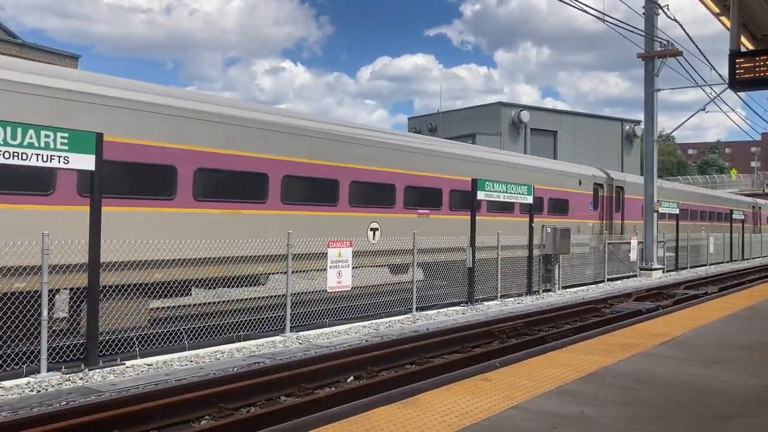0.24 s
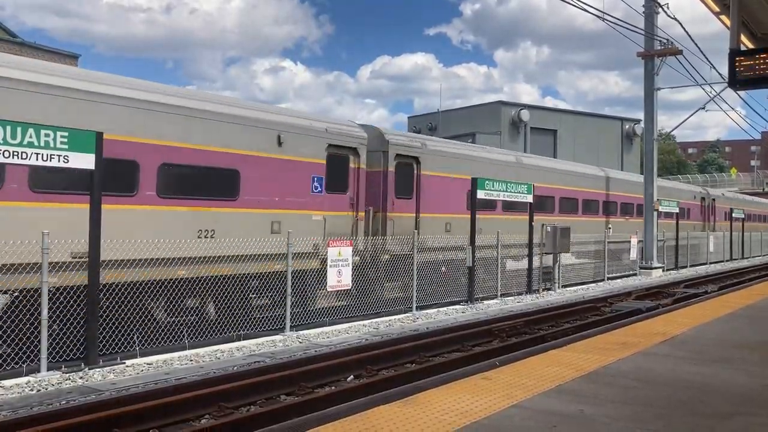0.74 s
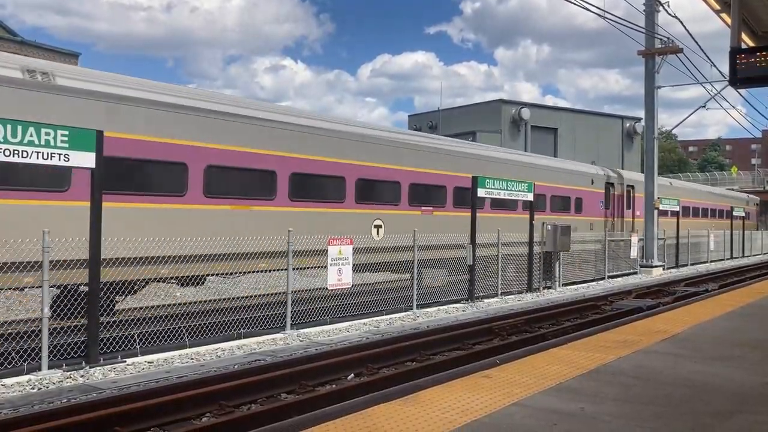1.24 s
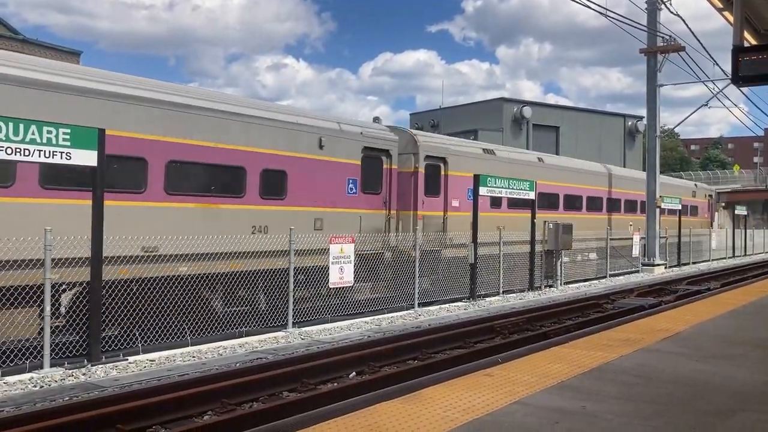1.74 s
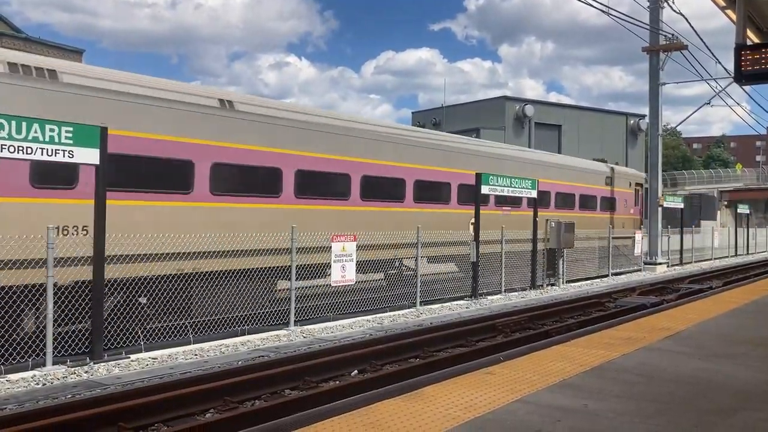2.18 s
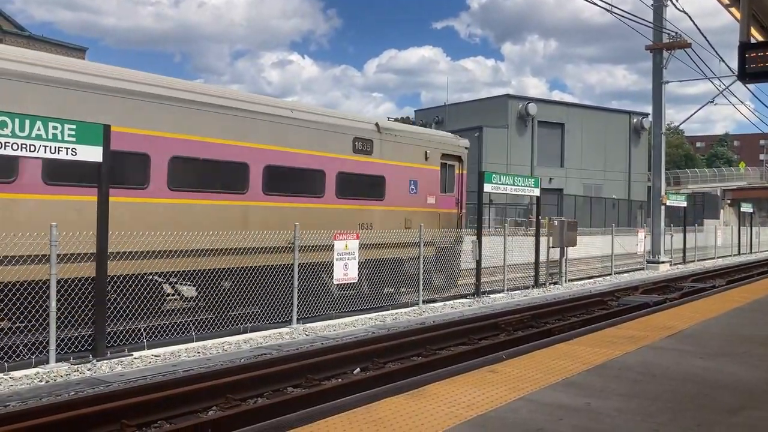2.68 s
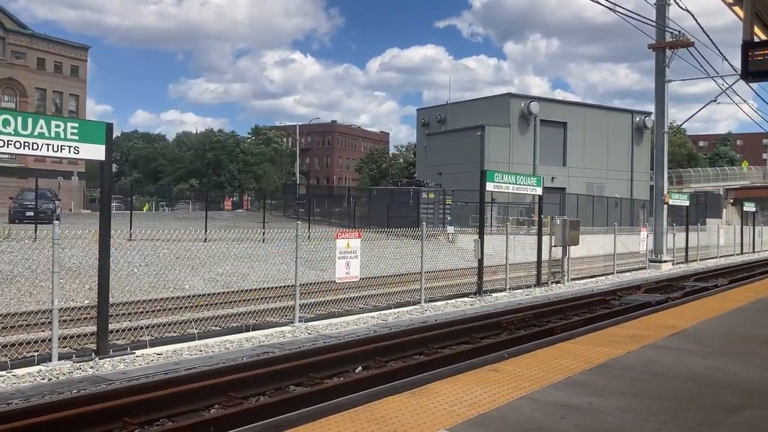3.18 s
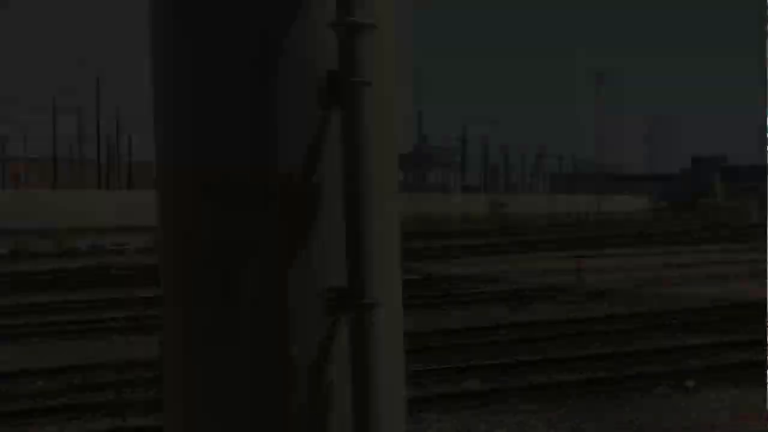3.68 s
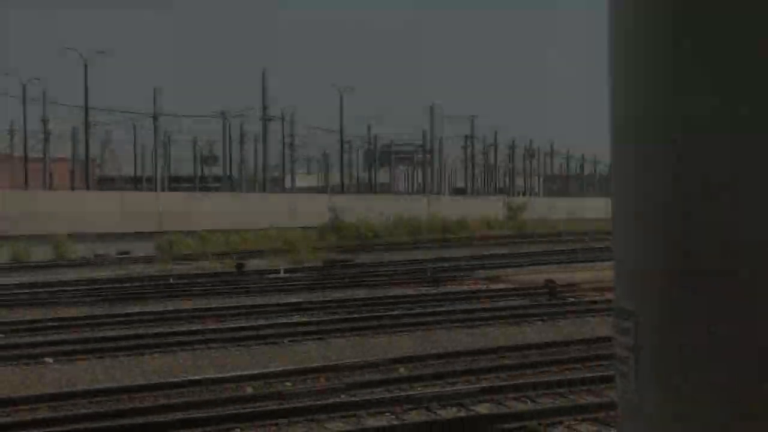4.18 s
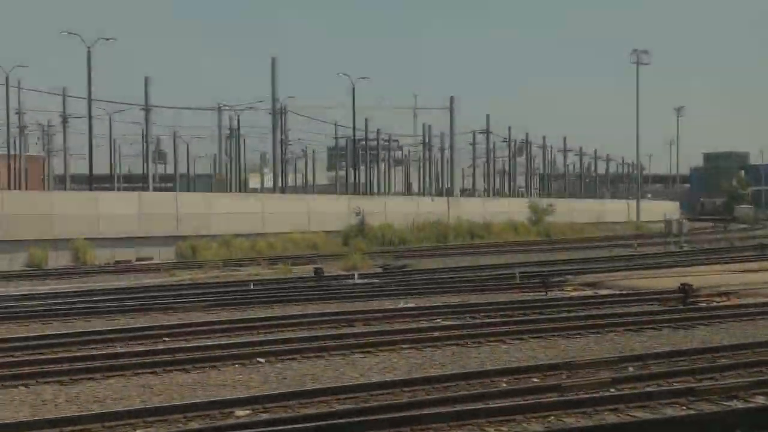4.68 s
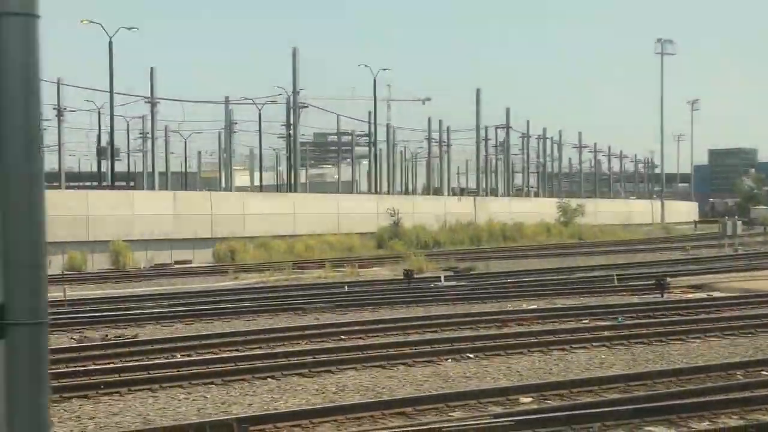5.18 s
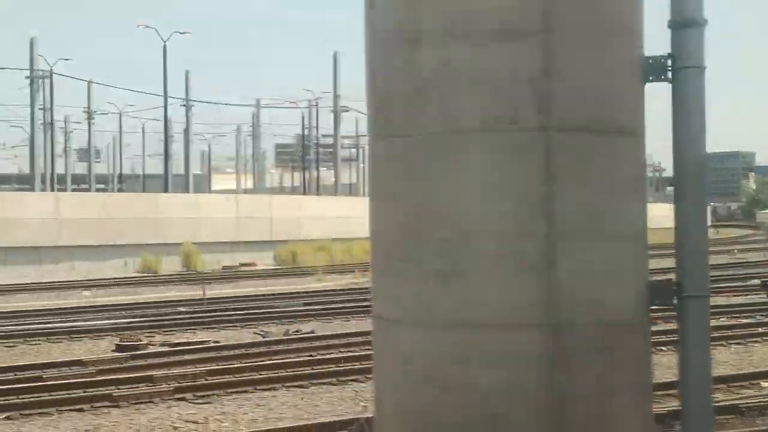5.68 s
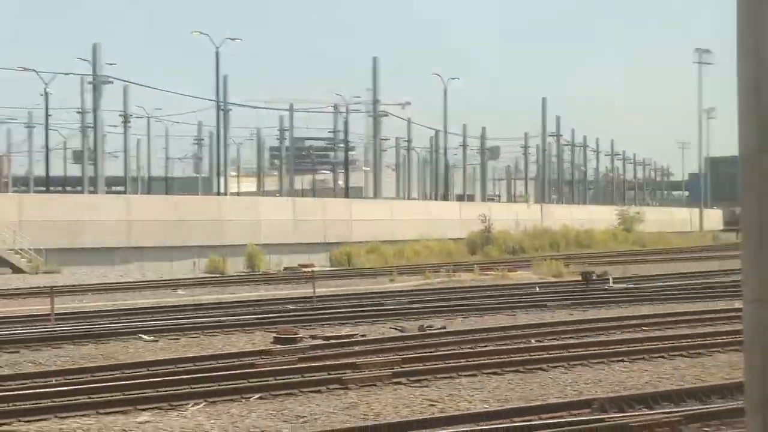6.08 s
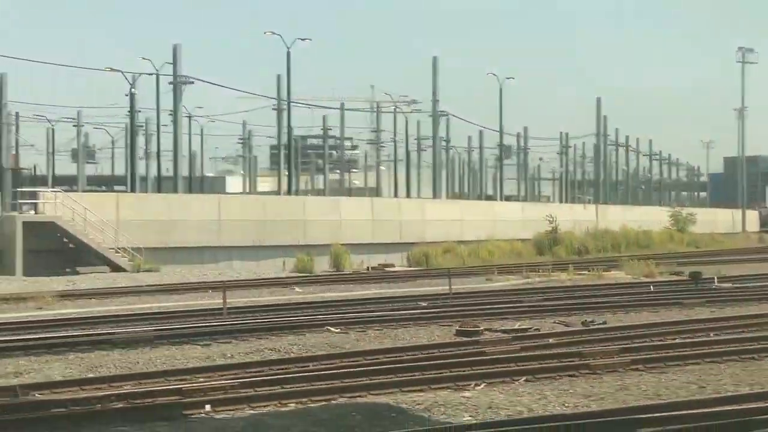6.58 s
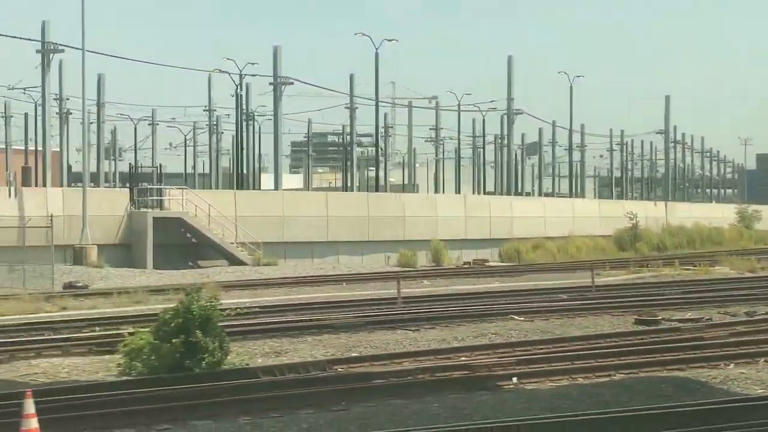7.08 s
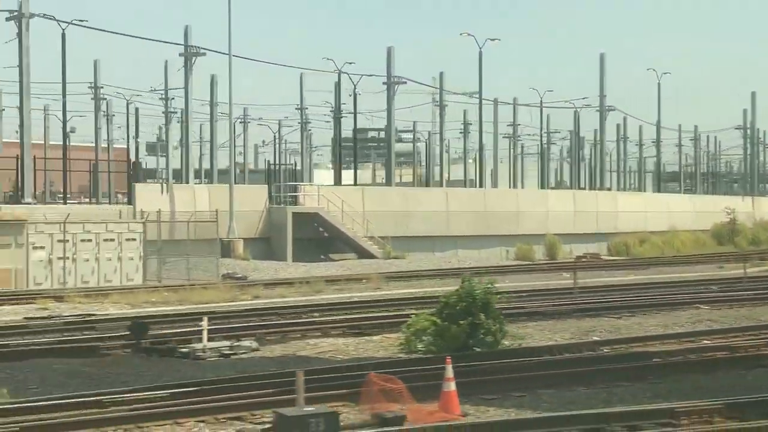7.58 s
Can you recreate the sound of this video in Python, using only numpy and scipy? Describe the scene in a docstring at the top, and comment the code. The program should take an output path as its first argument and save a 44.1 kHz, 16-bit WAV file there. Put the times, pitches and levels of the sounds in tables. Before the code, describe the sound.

At 0 s, on an open platform, coaches are already rolling past close by: grainy low roar, airy steel hiss, track rumble and a wavering low locomotive drone receding. From about 0.6 s scattered blows begin, and from 1 to 1.9 s a flat wheel pounds roughly ten times a second, each hard knock ringing rail and wheels and swelling the rush. Thin metallic rings glide downward in pitch. Weaker knocks continue to 2.7 s; the last wheels ring near 3.1 s and the roar falls away by 3.5 s. From 3.25 s an electric train interior fades in, full by 5.3 s: deep motor hum around 90 Hz, steady fan tones, boomy body and dulled rolling. Groans swell near 4.4 and 5.2 s. Around 6 s the hum beats over twice a second, with faint motor whines. Small trim ticks fall near 3.7, 4, 5.7 and 6.8-7 s; the ride continues steadily to the end.

```python
"""Commuter coaches roll past a station platform: roar, hiss and ringing wheels over a receding locomotive drone.
Soon a flat-spotted wheel pounds about ten times a second; each blow rings the track and swells the rolling.
Noise bands make the rolling, and narrow resonances that fall in Doppler pitch make the wheels ring.
The platform fades out and the inside of a moving electric train fades in: two beating motor tones, steady fan
tones, a booming car body, dulled rolling noise, groans of the car body and motor whines, and ticks of loose trim."""
import sys
import numpy as np
from scipy import signal
from scipy.fft import rfft, irfft
from scipy.io import wavfile
from scipy.ndimage import uniform_filter1d

SR = 44100
rng = np.random.default_rng(int(sys.argv[2]) if len(sys.argv) > 2 else 0)


def waveform_to_disk(signal):
    """Save audio, clipped to [-1, 1], as 16-bit WAV at the path in sys.argv[1]."""
    frames = np.transpose(np.atleast_2d(signal))
    scaled = np.clip(frames, -1, 1) * 32767
    samples = np.round(scaled).astype(np.int16)
    wavfile.write(sys.argv[1], SR, samples)


N = 345744
TIME, FREQ = np.arange(N) / SR, np.fft.rfftfreq(N, 1 / SR)  # s, Hz

# Rolling noise at the platform, before its swells: time_s, roar_db, hiss_db
PLATFORM_ROLL = [(0, -29, -38), (0.55, -25, -37.5), (1, -21, -32), (1.4, -21, -30), (1.8, -20, -34),
                 (2.2, -22.5, -36.5), (2.85, -29.5, -40.5), (3.25, -29.5, -41), (3.55, -40.5, -52.5)]
# Its spectrum before it is split into roar and hiss: frequency_hz, relative_db
PLATFORM_ROLL_COLOUR = [(120, -12), (200, -3.5), (400, -2), (600, -5), (800, -5), (1080, -10),
                        (1800, -15.5), (2500, -21.5), (3450, -29.5), (4400, -31.5), (6500, -30.5),
                        (9000, -40), (13000, -39.5), (15500, -78)]
# Bands in which the whole train of wheels and the rail radiate: pitch_hz, width_hz, lift_db
STEEL_BANDS = [(496, 60, 3), (720, 220, 0.5), (1250, 41, 2.5), (1660, 170, 2.5), (1980, 55, 4),
               (2216, 200, 4), (2950, 480, 4.5), (3880, 560, 6), (4420, 240, 4.5), (4840, 240, 3),
               (6030, 340, 0)]
# Single parts of the running gear ring out: nearest_s, half_length_s, pitch_hz, width_hz, level_db
GEAR_RINGS = [(.72, .07, 1565, 35, -34), (.78, 0.12, 2205, 70.6, -40), (.85, 0.18, 3150, 60, -52),
              (1.02, .08, 5000, 110, -48), (1.15, 0.14, 2140, 45, -42), (1.25, 0.14, 756, 60, -30.5),
              (1.37, 0.17, 1515, 45, -29.5), (1.38, .05, 5930, 100, -40), (1.45, 0.072, 4830, 80, -44),
              (1.5, 0.11, 3750, 90, -50), (1.62, 0.39, 215.9, 61, -26.5), (1.7, 0.081, 5130, 110, -50),
              (1.8, 0.13, 3940, 90, -46), (1.95, 0.12, 4900, 100, -46.5), (2.05, .16, 4150, 120, -43.5),
              (2.1, 0.16, 2800, 110, -44.5), (2.15, 0.059, 5640, 70.5, -47), (2.42, 0.073, 5020, 45, -53),
              (2.62, 0.13, 482, 70, -28.5), (2.9, 0.096, 1930, 25, -45), (2.94, 0.074, 4430, 70.8, -46),
              (3.06, 0.16, 1650, 45, -46), (3.1, 0.086, 4960, 130, -53), (3.12, .06, 5700, 70, -50),
              (3.15, 0.13, 3980, 90, -51), (3.24, 0.15, 2850, 130, -40)]
# What a coach wheel rings with: pitch_hz, width_hz, relative_db
WHEEL_MODES = [(1560, 64, 1.5), (2147, 50, -1.5), (2933, 120, -1), (3970, 57, -2.5), (4930, 70, -9.5),
               (5860, 100, -10.5)]
# Bogies (wheel frames) go by: nearest_s, level_db (both axles), tuning_ratio, treble_lift_db_per_octave
BOGIES = [(.15, -53, 1.01, 0), (.92, -47.5, 1.02, -9), (1.38, -36, .98, -4), (1.92, -44, .995, -6),
          (3.08, -48, 1.0, 5)]
# Track rumble: time_s, level_db
RUMBLE_LEVEL = [(0, -28), (1.1, -28.5), (2, -33), (3.3, -35)]
# Spectrum of the rumble: frequency_hz, relative_db
RUMBLE_COLOUR = [(15, -40), (30, -34), (42, -9), (56, -8), (85, -2), (120, -9), (170, -4.5), (400, -58)]
# What rail, sleepers and bogie ring with: pitch_hz, relative_db, time_to_fall_60_db_s
TRACK_MODES = [(202, 6, 0.15), (243, 3.5, 0.091), (302.8, 2.5, 0.14), (367.6, 8, 0.089), (468, 4, 0.1),
               (766, 10.5, 0.065), (926, 2, 0.076), (1310, 5.5, 0.062), (2070, -1, 0.018),
               (2720, -21, 0.014)]
# Blows on the rail, most from the flat spot that strikes once a turn: start_s, strength_db, strongest_pitch_hz
BLOWS = [(0.602, -21, 400), (0.775, -26, 253), (0.876, -16, 380), (0.963, -16.5, 404), (0.996, -17.5, 242),
         (1.057, -6.5, 368), (1.063, -15.5, 865), (1.16, -10, 223.1), (1.184, -21, 298), (1.256, -8, 748),
         (1.279, -21, 398), (1.353, -9, 484), (1.444, -18, 305), (1.468, -13, 297), (1.544, -13.5, 300),
         (1.575, -16.5, 203), (1.612, -25, 232), (1.664, -11.5, 424), (1.703, -18.5, 248),
         (1.74, -13.5, 334), (1.786, -11, 322), (1.838, -16.5, 372), (1.885, -13, 300), (1.931, -24, 237),
         (2.195, -17.5, 716), (2.292, -24, 760), (2.377, -22, 383), (2.483, -23, 264), (2.621, -22, 486),
         (2.69, -22, 498)]
# Spectrum of the rolling heard inside, before it is split: frequency_hz, relative_db
RIDE_COLOUR = [(120, -12), (290, -3.5), (400, -2), (640, 3.5), (840, -2), (1000, -5), (1380, -8),
               (1700, -14.5), (2300, -15), (3300, -20), (4300, -20), (5200, -25), (9000, -36),
               (15000, -49.5)]
# Spectrum of the car body's boom: frequency_hz, relative_db
BOOM_COLOUR = [(15, -30), (31, -31), (43, -12.5), (65, -13.5), (105, -8.5), (132, -11.5), (152, -19.5),
               (167, 1.5), (177, -8), (200, -6), (216, -13), (255, -22.5), (330, -24), (700, -81)]
# How hard the car body is shaken: time_s, level_db
SHAKE = [(3.2, -2.5), (4.2, -0.5), (4.9, -3.5), (5.12, -1), (5.6, -.5), (7.85, 0.5)]
# Body groans and motor whines swell and fade: centre_s, half_length_s, pitch_hz, width_hz, level_db
CAR_GROANS_AND_WHINES = [(4.39, 0.15, 174, 21, -24), (5.19, 0.1, 175.4, 22, -21.5),
                         (5.19, 0.05, 241.5, 19, -26.5), (5.33, 0.048, 294, 35, -36.5),
                         (6.66, 1.87, 381.5, 43, -36.5), (6.15, 1.22, 561.2, 12, -38.5),
                         (6.2, 2.4, 659, 22, -41.5), (6.2, 1.6, 754, 67, -46), (6.26, 2.2, 973, 123, -37.5)]
# Level of the second motor against the first: time_s, relative_db
SECOND_MOTOR = [(3.2, -20), (5.8, -24), (6.15, -6), (7.85, -14)]
# The hum dips briefly: centre_s, half_length_s, change_db
HUM_DIPS = [(3.733, 0.014, -15), (4.015, 0.016, -13), (4.307, 0.019, -9), (4.56, 0.043, -7)]
# Fans and pumps, some in close pairs that beat: pitch_hz, relative_db
FANS = [(45, -17.5), (117.7, -7.5), (119.04, -10.5), (147.2, -8), (161, -9.5), (167.3, -4.5), (171.6, -9),
        (178.4, -4.5), (188, -12.5), (201, -17), (235.6, -18), (237.7, -12.5), (297, -35), (382.2, -22)]
# Ticks of loose trim: start_s, relative_db, time_to_fall_60_db_s
TICKS = [(3.698, -44, 0.34), (3.9924, -40.5, 0.32), (5.7244, -42, 0.15), (6.761, -29.5, 0.33),
         (6.8867, -31.5, 0.42), (6.901, -40, 0.22), (6.966, -38, 0.2)]
# Spectrum of the ticks: frequency_hz, relative_db
TICK_COLOUR = [(1000, -21), (3000, 9), (6500, 7), (12000, -1), (16000, -14)]
# Left and right on the platform: frequency_hz, likeness_0_to_1, left_minus_right_db
OUTSIDE_STEREO = [(70, 0.82, 8), (171, 0.92, 3.5), (340, 0.68, 2), (704, 0.62, 1.2), (1500, 0.45, 3.5),
                  (3000, 0.05, 1.5), (5350, 0, 1.5), (8600, 1, -0.5), (12000, 0.98, 0)]
# Left and right inside the train: frequency_hz, likeness_0_to_1, left_minus_right_db
INSIDE_STEREO = [(71, 0.74, 7), (173, 0.93, 3), (338, 0.25, 0.5), (700, 0.23, -0.5), (1490, 0.066, 5),
                 (3000, 0.042, 6.5), (5300, 0.36, 2.5), (8900, 1, -1.3), (12000, 0.79, 0.0)]

SPEED_M_PER_S, SOUND_M_PER_S, WHEELBASE_M = 23.1, 343, 2.6
WHEEL_TURNS_HZ = 10.1
# The rolling noise and the wheels swell with each blow
SURGE_PEAK_S, SURGE_POWER = 0.012, 0.53
# Bogies: length of ringing, time scale of the pitch glide, full range of axle tuning (share of the pitch)
BOGIE_HALF_S, GLIDE_S, AXLE_DETUNE = 0.264, 0.34, 0.024
# Many fainter wheels: level against the hiss, full range of tuning (share of the pitch), one ring's length and width
CROWD_DB, CROWD_DETUNE, CROWD_HALF_S, CROWD_WIDTH_HZ = -8, 0.115, 0.046, 43
WHEELS_FADE_S, WHEELS_GONE_S = 3.05, 3.55
# Small knocks of rough treads and loose gear; the spread sets how uneven their sizes are
KNOCKS_PER_S, KNOCK_DB, KNOCK_SPREAD_DB = 70, -7, 1  # KNOCK_DB is against the roar
# The locomotive's exhaust drone throbs irregularly and recedes
DRONE_DB, DRONE_FALL_DB_PER_S, THROB_DB = -26.5, 8.5, -4.5
# The ride fades in, then holds; the powers bend the fade
FADE_START_S, FADE_FULL_S = 3.246, 5.3
ROAR_FADE_POWER, BOOM_FADE_POWER, HUM_FADE_POWER = 0.8, 0.75, 0.98
RIDE_ROAR_DB, RIDE_HISS_DB = -30.5, -38.5
BOOM_DB, BOOM_SWELL_DB = -25, 1
# Two motors at nearly one speed beat; one of the beat's dips falls at BEAT_DIP_S
HUM_HZ, HUM_DB, HUM_WAVER_DB = 90.0, -18, 0.95
BEAT_HZ, BEAT_DIP_S = 2.42, 6.18
FANS_DB = -23.5
SNAP_S, RATTLE_SHARE = 0.0015, 0.22
LEFT_LAG_S, TREBLE_EDGE_HZ = 0.000268, 15750


def gain_of(db):
    """Turns decibels into a gain."""
    return 10 ** (np.asarray(db) / 20)


def evened(x):
    """Scales a sound to an average (rms) strength of 1."""
    return x / np.sqrt(np.mean(x ** 2) + 1e-20)


def read(points, hz, axis=1):
    """Reads one column of a table between its points, on a log frequency scale."""
    table = np.array(points, float)
    return np.interp(np.log(hz + 1), np.log(table[:, 0] + 1), table[:, axis])


def level(rows, axis=1):
    """Turns one dB column over time into a gain that fades 80 dB a second beyond its ends."""
    table = np.array(rows, float)
    beyond_s = np.maximum(table[0, 0] - TIME, 0) + np.maximum(TIME - table[-1, 0], 0)
    return gain_of(np.interp(TIME, table[:, 0], table[:, axis]) - 80 * beyond_s)


def wander(hz, size=4096):
    """Drifts slowly at random with rms 1, with up to about hz changes a second."""
    step_s = TIME[-1] / (size - 1)
    smoothing = np.exp(-(np.fft.rfftfreq(size, step_s) / hz) ** 2)
    slow = irfft(rfft(rng.standard_normal(size)) * smoothing, size)
    return np.interp(TIME, np.arange(size) * step_s, evened(slow))


def coloured(x, colour):
    """Filters a sound by the levels of a spectrum table."""
    return irfft(rfft(x) * gain_of(read(colour, FREQ)), N)


def noise(colour, patchy_db):
    """Makes two unrelated noises of one colour that share short-lived patches over time and frequency."""
    _, _, spectra = signal.stft(rng.standard_normal((2, N)), SR, nperseg=512)
    patches = rng.standard_normal(spectra.shape[1:])
    patches = uniform_filter1d(patches, size=9, axis=0)  # smooth over frequency
    patches = evened(uniform_filter1d(patches, size=10, axis=1))  # and over time
    patchy = signal.istft(spectra * gain_of(patchy_db * patches), SR)[1][:, :N]
    return coloured(patchy, colour)


def band(x, low_hz, high_hz):
    """Scales a whole sound so that the given band has rms 1."""
    inside = (FREQ > low_hz) & (FREQ < high_hz)
    return x / np.std(irfft(rfft(x) * inside, N))


def stereo(x, field):
    """Turns two unrelated signals into a partly alike left and right, with a level lean and a late left."""
    a, b = rfft(x)
    same = np.clip(read(field, FREQ), 0, 1)
    lean = gain_of(read(field, FREQ, axis=2) / 2)
    left = a * lean * np.exp(-2j * np.pi * FREQ * LEFT_LAG_S)
    right = (same * a + np.sqrt(1 - same ** 2) * b) / lean
    return irfft(np.array([left, right]), N)


def rolling(colour, patchy_db, split_hz):
    """Rough steel on steel: a low roar and a high hiss; wheels are too small to radiate deep bass."""
    x = noise(colour, patchy_db)
    low = 1 / (1 + (FREQ / split_hz) ** 4)
    no_bass = FREQ ** 4 / (FREQ ** 4 + 110 ** 4)
    roar = irfft(rfft(band(x, 250, 1200)) * low * no_bass, N)
    hiss = irfft(rfft(band(x, 2000, 8000)) * (1 - low), N)
    return roar, hiss


def sing(rows, doppler, passing_s, flutter_db, breakup_db):
    """Narrow noisy tones swell, flutter and fade; with Doppler they are sharp on approach, flat when leaving."""
    step = 32  # the slow swings are worked out at every 32nd sample
    out, contact = np.zeros((2, N)), wander(15)[::step]
    rub = rng.standard_normal((2, len(contact))) + 1j * rng.standard_normal((2, len(contact)))
    for s, length, hz, width, db in rows:
        near = slice(*np.searchsorted(TIME, [s - 2.5 * length, s + 2.5 * length]))
        t = TIME[near][::step] - s
        # each ring takes its own random stretch of the rubbing
        stretch = (np.arange(len(t)) + int(rng.random() * len(contact))) % len(contact)
        swing = signal.lfilter(*signal.butter(2, width / 2, fs=SR / step), rub[:, stretch])
        # roughness comes round once in every turn of the wheel
        flutter = flutter_db * np.sin(2 * np.pi * (WHEEL_TURNS_HZ * t + rng.random()))
        # the contact grips and lets go at random
        swing *= gain_of(flutter + breakup_db * contact[stretch])
        swing *= gain_of(db) / np.std(swing.real) * np.exp(-(t / length) ** 2 / 2)
        turns = hz * np.cumsum(1 - doppler * np.tanh(t / passing_s)) * step / SR
        tone = np.exp(2j * np.pi * np.interp(TIME[near], s + t, turns))
        out[:, near] += [(np.interp(TIME[near], s + t, side) * tone).real for side in swing]
    return out


def bogie_modes():
    """Both axles of each passing bogie ring in all wheel modes, with the bogie's own tuning and brightness."""
    middle_hz = WHEEL_MODES[2][0]
    lead_s = 0.5 * WHEELBASE_M / SPEED_M_PER_S
    rows = []
    for s, db, tuning, lift_db in BOGIES:
        for axle_s in (-lead_s, lead_s):
            for hz, width, mode_db in WHEEL_MODES:
                pitch = hz * (tuning + AXLE_DETUNE * (rng.random() - 0.5))
                axle_db = db - 10 * np.log10(2)  # the two axles share the power
                loud = axle_db + mode_db + lift_db * np.log2(hz / middle_hz)
                rows.append((s + axle_s, BOGIE_HALF_S, pitch, width, loud))
    return rows


def other_wheels(count=280):
    """Many fainter wheels, each a little differently tuned, ring briefly one after another."""
    when, detune, size = rng.random((count, 3)).T
    s = 3.3 * (np.arange(count) + when) / count  # spread over 3.3 s
    hz, _, mode_db = np.array(WHEEL_MODES)[np.arange(count) % len(WHEEL_MODES)].T
    roll = np.array(PLATFORM_ROLL)
    db = np.interp(s, roll[:, 0], roll[:, 2]) + CROWD_DB + mode_db - 5 * size
    pitches = hz * (1 + CROWD_DETUNE * (detune - 0.5))
    return [(at, CROWD_HALF_S, pitch, CROWD_WIDTH_HZ, loud) for at, pitch, loud in zip(s, pitches, db)]


def coaches():
    """Rolling noise and ringing wheels swell with each blow of the flat-spotted wheel."""
    roar, hiss = rolling(PLATFORM_ROLL_COLOUR, patchy_db=1.4, split_hz=1500)
    surge = np.zeros(N)
    age = np.arange(SR // 4) / SR / SURGE_PEAK_S
    for s, db, _ in BLOWS:
        swell = surge[round((s - 0.0038) * SR):][:len(age)]  # starts just ahead of the blow
        swell += gain_of(SURGE_POWER * db) * age * np.exp(1 - age)
    surge -= uniform_filter1d(surge, size=8800)  # keep only the change around a 0.2 s average
    roll = roar * level(PLATFORM_ROLL) * gain_of(-0.5 + 3.9 * surge)
    roll += hiss * level(PLATFORM_ROLL, axis=2) * gain_of(-1.5 + 6.1 * surge)
    lift_db = sum(db * np.exp(-(2 * (FREQ - hz) / width) ** 2 / 2) for hz, width, db in STEEL_BANDS)
    roll = irfft(rfft(roll) * gain_of(lift_db), N)
    wheels = sing(GEAR_RINGS + bogie_modes() + other_wheels(), doppler=SPEED_M_PER_S / SOUND_M_PER_S,
                  passing_s=GLIDE_S, flutter_db=2.0, breakup_db=2.5)
    fade_out = np.interp(TIME, [WHEELS_FADE_S, WHEELS_GONE_S], [1, 0])
    return roll + wheels * gain_of(11.4 * surge) * fade_out


def locomotive():
    """A drone of two wavering exhaust tones far down the line, over the noisy rumble of the track."""
    drone = np.zeros(N)
    for hz, db in [(84.5, 0.0), (96, -3.0)]:
        pitch_hz = hz + 1.05 * wander(7.0)
        drone += gain_of(db) * np.sin(2 * np.pi * np.cumsum(pitch_hz) / SR)
    rumble = evened(coloured(rng.standard_normal((2, N)), RUMBLE_COLOUR)) * level(RUMBLE_LEVEL)
    receding = gain_of(DRONE_DB - DRONE_FALL_DB_PER_S * TIME + THROB_DB * wander(3.3))
    return drone * receding * np.array([[1], [0]]) + rumble  # the drone is in the first signal only


def knocks():
    """Small irregular knocks ring single modes of the track, thickening the roar."""
    t, out = np.arange(SR // 8) / SR, np.zeros((2, N))
    chance, size, which = rng.random((3, N))
    sizes = gain_of(-KNOCK_SPREAD_DB * np.log(np.maximum(size, 0.1)))
    hits = (chance < KNOCKS_PER_S / SR) * sizes
    mode = (which * len(TRACK_MODES)).astype(int)
    rise = 1 - np.exp(-t / 0.002)
    for at in np.flatnonzero(hits):
        hz, db, t60 = TRACK_MODES[mode[at]]
        turns = hz * (1 + 0.053 * rng.standard_normal()) * t + rng.random((2, 1))
        knock = hits[at] * gain_of(db - 60 * t / t60) * rise * np.sin(2 * np.pi * turns)
        out[:, at:at + len(t)] += knock[:, :N - at]
    return evened(out) * gain_of(KNOCK_DB) * level(PLATFORM_ROLL)


def flat_spot():
    """Each blow rings the track; where it lands retunes the modes and decides which answers most."""
    out = np.zeros((2, N))
    t = np.arange(SR // 4) / SR
    rise = 1 - np.exp(-t / 0.004)
    modes_hz = np.array(TRACK_MODES)[:, 0]
    for s, db, strongest_hz in BLOWS:
        nearest_hz = modes_hz[np.argmin(abs(modes_hz - strongest_hz))]
        tuning = strongest_hz / nearest_hz
        blow = np.zeros(len(t))
        for hz, mode_db, t60 in TRACK_MODES:
            octaves_away = abs(np.log2(hz * tuning / strongest_hz))
            favour_db = -9 * min(octaves_away / 0.34, 1)
            turns = hz * tuning * (1 + 0.02 * rng.standard_normal()) * t + rng.random()
            blow += gain_of(mode_db + favour_db - 60 * t / t60) * np.sin(2 * np.pi * turns)
        part = out[0, round(s * SR):][:len(t)]
        part += gain_of(db) * blow * rise
    return out


def fade_in():
    """Gives the gain of the ride: a straight rise, then steady."""
    return np.clip((TIME - FADE_START_S) / (FADE_FULL_S - FADE_START_S), 0, 1)


def cabin():
    """Rolling noise dulled by the walls, the boom and groans of the car body, and motor whines."""
    roar, hiss = rolling(RIDE_COLOUR, patchy_db=0.5, split_hz=1070)
    roar = gain_of(RIDE_ROAR_DB) * roar * fade_in() ** ROAR_FADE_POWER
    hiss = gain_of(RIDE_HISS_DB) * hiss * fade_in()
    boom = band(noise(BOOM_COLOUR, patchy_db=0.5), 135, 220)
    swell = gain_of(BOOM_DB + BOOM_SWELL_DB * wander(1.9)) * level(SHAKE) * fade_in() ** BOOM_FADE_POWER
    groans_and_whines = sing(CAR_GROANS_AND_WHINES, doppler=0, passing_s=1, flutter_db=1.5, breakup_db=1)
    groans_and_whines *= np.clip(TIME - 3.5, 0, 1)  # rise from 3.5 to 4.5 s
    return roar + hiss + boom * swell + groans_and_whines


def machinery():
    """Two motor tones beat as they slip past each other, beside steady fan tones, heard through the floor."""
    phase = 2 * np.pi * HUM_HZ * TIME + 0.16 * wander(1.8)
    slip = 2 * np.pi * BEAT_HZ * (TIME - BEAT_DIP_S)
    dips_db = sum(db * np.exp(-((TIME - s) / length) ** 2 / 2) for s, length, db in HUM_DIPS)
    motors = np.sin(phase) - level(SECOND_MOTOR) * np.sin(phase - slip)
    motors *= gain_of(HUM_DB + HUM_WAVER_DB * wander(4.5) + dips_db)
    fans = np.zeros(N)
    for hz, db in FANS:
        fans += gain_of(FANS_DB + db) * np.sin(2 * np.pi * hz * TIME + 0.59 * wander(4.1))
    hum = np.sqrt(2) * (motors + fans * level(SHAKE)) * fade_in() ** HUM_FADE_POWER  # sqrt(2): rms to peak
    return hum * np.array([[1], [0]])  # in the first signal only


def trim():
    """Small bright ticks of loose trim: noise shaped into a sharp snap and a short rattle."""
    envelope, age = np.zeros(N), np.arange(SR // 3) / SR
    for s, db, t60 in TICKS:
        rattle = RATTLE_SHARE * gain_of(-60 * age / max(t60, 0.01))
        envelope[round(s * SR):][:len(age)] += gain_of(db) * (np.exp(-age / SNAP_S) + rattle)
    bright = evened(coloured(rng.standard_normal((2, N)), TICK_COLOUR))
    return gain_of(1.0) * envelope * bright


def scene():
    """Adds the platform and the ride, each with its own left and right."""
    platform = coaches() + flat_spot() + knocks() + locomotive()
    ride = cabin() + machinery() + trim()
    return stereo(platform, OUTSIDE_STEREO) + stereo(ride, INSIDE_STEREO)


def record(dry):
    """Softly rounds off the highest peaks, then cuts the treble above a steep edge."""
    rounded = dry / (1 + (dry / 0.92) ** 6) ** (1 / 6)
    low_pass = signal.firwin(511, TREBLE_EDGE_HZ, window=("kaiser", 9), fs=SR)
    return signal.oaconvolve(rounded, low_pass[None], "same")


dry = scene()
out = record(dry)
waveform_to_disk(out)
```